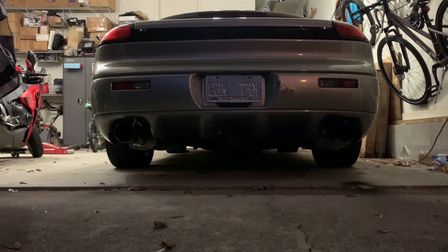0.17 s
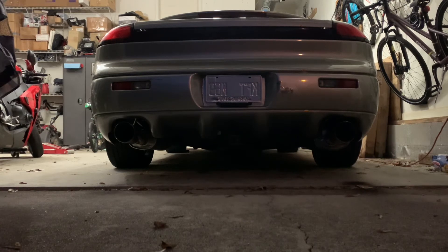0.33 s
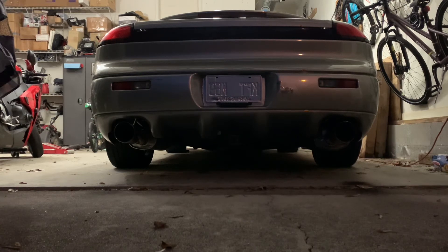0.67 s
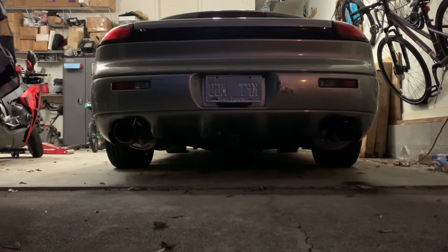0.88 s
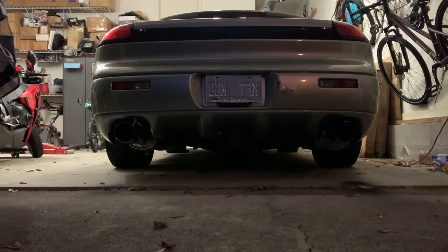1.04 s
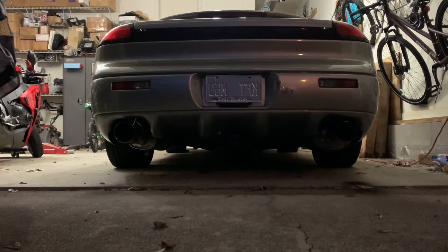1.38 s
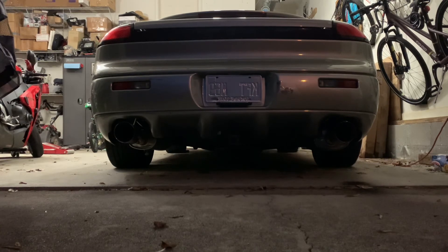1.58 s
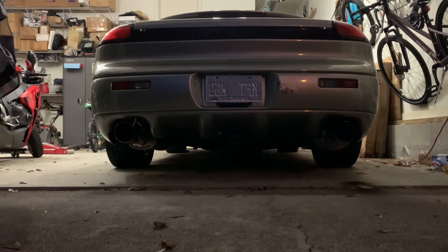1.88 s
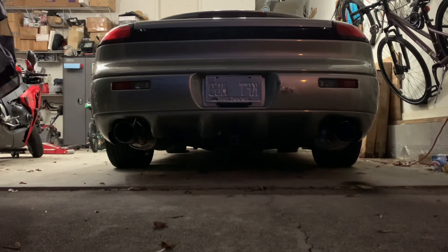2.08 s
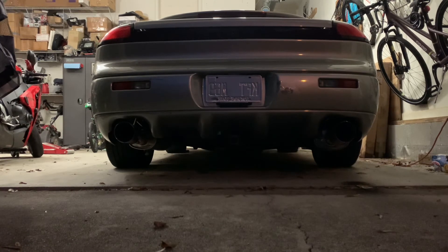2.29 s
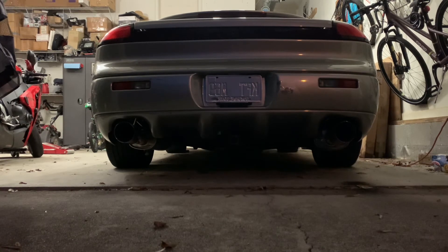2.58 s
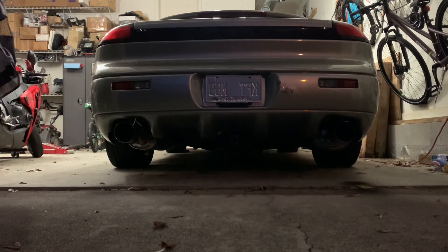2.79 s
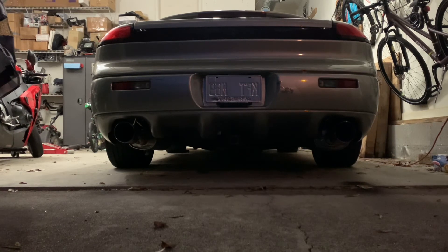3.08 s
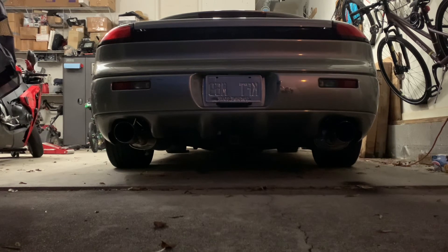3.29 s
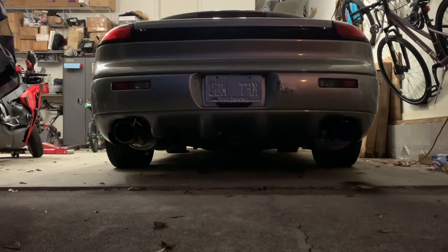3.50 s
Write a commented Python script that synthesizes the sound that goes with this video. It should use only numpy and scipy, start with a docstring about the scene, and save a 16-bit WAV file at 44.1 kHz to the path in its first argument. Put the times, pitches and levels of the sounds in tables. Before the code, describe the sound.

A car engine idles unevenly with a low, throbbing exhaust rumble and small crackling ticks.

```python
"""Open garage, low behind the tailpipes: a six-cylinder car idles unevenly, speeding up and settling.
Each firing sends three pressure surges through the silencer and knocks the pipe modes into ringing;
now and then a cylinder fires weakly and the next one harder. Filtered noise makes the gas rush, which
pulses in step, the mid-band puffs and the wavering rasp. Hot metal spits in grainy treble hisses,
over short squeaks and two thin whining tones made of sines."""
import sys
import numpy as np
from scipy import signal
from scipy.fft import rfft, irfft, next_fast_len
from scipy.io import wavfile
from scipy.ndimage import map_coordinates

SR = 44100
rng = np.random.default_rng(int(sys.argv[2]) if len(sys.argv) > 2 else 0)


def unload_audio(sound):
    """Save the sound as a 16-bit wav file, at the path given as the first command line argument."""
    columns = np.transpose(np.atleast_2d(sound))
    # keep every value between -1 and 1, then stretch to whole-number steps
    steps = np.round(np.clip(columns, -1, 1) * 32767)
    wavfile.write(sys.argv[1], SR, steps.astype(np.int16))


N = 160524
TIME = np.arange(N) / SR

# Engine speed: (time [s], firing rate [Hz])
FIRING_RATE = [(0.0, 26.0), (0.12, 26.13), (0.3, 28.14), (0.5, 29.76), (0.7, 30.79), (0.85, 31.67),
               (1.05, 33.54), (1.2, 33.47), (1.4, 33.33), (1.7, 32.56), (2.1, 31.78), (2.3, 32.26),
               (2.42, 32.26), (2.6, 30.79), (2.9, 29.4), (3.15, 29.61), (3.4, 28.64), (3.64, 27.16)]
# Firings that are weak or ring the pipe little: (time [s], strength [dB], pipe ring [dB])
WEAK_FIRINGS = [(.01, 0, -10), (.16, 0, -14), (.2, -5, -6), (.415, -4, -4), (.515, -2, -6), (.65, -3, -14),
                (.715, -5, -8), (.84, -3, -14), (.995, -6, -4), (1.175, -10, -12), (1.445, -8, -12),
                (1.565, -5, -14), (1.905, -8, -8), (2.03, -8, -12), (2.065, 2, -9), (2.28, -6, -6),
                (2.405, -4, -16), (2.56, -6, -8), (2.69, -7.5, -18), (2.86, -8, -10), (2.89, -3, -10),
                (3.06, -7, -10), (3.095, -2, -12), (3.195, -2, -10), (3.265, -3, -4), (3.405, -3, -14)]
# Pressure surges of one firing:
# (delay [firing intervals], relative level [dB], width [firing intervals], share of the firing's dB [ratio])
FIRING_SURGES = [(.19, -2, .085, .75), (.625, 0, .085, 1.3), (.94, -4, .075, 2)]
# Silencer response: (frequency [Hz], relative gain [dB])
SILENCER_GAIN = [(20, 8), (31, -16), (41, 13), (50, 5), (65, 6.5), (82, 2.8), (110, -1.26), (150, -2.5),
                 (172, -1.5), (200, -15), (260, -7.5), (300, -6), (340, -41), (400, -55)]
# Gas rush and engine-bay noise spectrum: (frequency [Hz], relative density [dB per Hz])
RUSH_SPECTRUM = [(120, -7), (200, -11.5), (300, -11.5), (340, -12.5), (375, -15), (430, -8.5), (520, -14.5),
                 (700, -18), (980, -30), (1280, -22), (1700, -32.5), (1920, -32), (2500, -33), (3050, -36),
                 (3160, -39.5), (4000, -39.5), (6300, -47), (7200, -56.5), (8000, -45), (10000, -45),
                 (12000, -56), (13500, -53)]
# Stereo likeness of the rush: (frequency [Hz], left-right correlation [-1 to 1])
RUSH_LIKENESS = [(100, -0.63), (200, 1), (320, 0.44), (800, 0.85), (1500, 0.51), (2300, 0.19),
                 (2800, -0.36), (4000, -0.24), (8000, 0.17), (12000, 1)]
# Stereo balance of the rush: (frequency [Hz], left over right [dB])
RUSH_BALANCE = [(100, -10), (250, -8.5), (500, 1), (1000, 0.1), (2000, -1), (4000, 1.3), (8000, 5.5),
                (12000, 1.5)]
# Treble hiss, used about its average: (time [s], relative level [dB])
TREBLE_LEVEL = [(0.05, -40.5), (0.24, -39.5), (1.95, -41.5), (2.31, -40.5), (2.77, -42.5), (3.6, -40.5)]
# Faint wavering resonances of pipe and engine bay:
# (frequency [Hz], width [Hz], level before wavering [dB], left-right correlation [-1 to 1])
RASP_RESONANCES = [(420, 22, -31, .9), (1131, 50, -54, .9), (1260, 50, -54, .9), (1513, 30, -55, .7),
                   (1925, 70, -60, .6), (2362, 40, -66, 0), (2619, 70, -65, -.6), (2735, 35, -65, -.7),
                   (3158, 50, -67, -.3)]
# Thin steady tones: (frequency [Hz], rms level [dB])
WHINE_TONES = [(6491, -74), (12989, -79)]
# Modes of the pipe: (frequency [Hz], relative level [dB], 60 dB decay [s], knock length [s])
RING_MODES = [(416.3, 3.5, 0.077, 0.015), (445, -25, 0.036, 0.02), (286.7, -6, 0.063, 0.018),
              (572, -7.5, 0.042, 0.0038), (685, -10.5, 0.087, 0.009)]
# Moments when the pipe rings out: (time [s], relative level [dB])
RING_OUTS = [(0.273, -19), (0.311, -18), (0.379, -20), (0.414, -16), (0.481, -15), (0.584, -15),
             (0.615, -20), (0.633, -18), (0.712, -17), (0.777, -17), (0.809, -14), (0.905, -21),
             (0.965, -17), (0.995, -13), (1.042, -20), (1.087, -17), (1.142, -16), (1.175, -18),
             (1.234, -17), (1.268, -15), (1.322, -13), (1.352, -18), (1.375, -19), (1.408, -21),
             (1.445, -18), (1.506, -16), (1.536, -13), (1.638, -19), (1.689, -19), (1.719, -18),
             (1.779, -14), (1.81, -16), (1.872, -17), (1.903, -17), (1.999, -16), (2.019, -20),
             (2.105, -21), (2.154, -16), (2.182, -18), (2.277, -16), (2.342, -17), (2.372, -14),
             (2.394, -21), (2.481, -19), (2.528, -18), (2.561, -16), (2.625, -19), (2.825, -16),
             (2.86, -20), (3.028, -18), (3.063, -18), (3.164, -20), (3.266, -18), (3.336, -17),
             (3.392, -20)]
# Short squeaks: (start [s], relative level [dB], frequency [Hz])
SQUEAK_EVENTS = [(.079, -51, 3170), (.14, -48, 3180), (.208, -48, 3180), (.419, -44, 3170),
                 (.623, -48, 3170), (.8, -47, 3150), (1.302, -51, 3140), (1.724, -51, 3130),
                 (.3, -53, 3140), (1.058, -52, 3150), (1.148, -52, 3140), (1.665, -53, 3140),
                 (2.257, -53, 3150), (3.149, -51, 3150), (3.365, -52, 3200)]
# Coarse puffs of gas at the tailpipes: (time [s], relative level [dB])
GAS_PUFFS = [(0.085, -30), (0.139, -31), (0.183, -32), (0.232, -32), (0.284, -33), (0.305, -31),
             (0.423, -29), (0.553, -32), (0.592, -31), (0.623, -29), (0.812, -32), (0.855, -32),
             (0.946, -32), (0.976, -32), (1.023, -34), (1.067, -33), (1.113, -33), (1.186, -32),
             (1.242, -33), (1.272, -32), (1.362, -33), (1.542, -32), (1.76, -32), (2.322, -32),
             (2.379, -31), (2.506, -33), (2.665, -32), (2.805, -31), (2.955, -33), (3.039, -33),
             (3.173, -33), (3.207, -34), (3.382, -33), (3.523, -30), (3.561, -34), (3.592, -32)]
# Hot metal spits: (start [s], relative level [dB], centre frequency [Hz], 60 dB decay [s],
# left over right [dB], relative level of the mid band [dB])
METAL_SPITS = [(0.086, -40, 10000, 0.38, 5, -24), (0.123, -40, 10400, 0.48, 4, -23),
               (0.2147, -42, 9400, 0.67, 12, -36), (0.269, -38, 11400, 0.27, 2, -39),
               (0.4592, -37.5, 10500, 0.24, 5, -32), (0.5487, -39.5, 10000, 0.32, 5, -32),
               (0.9449, -34.5, 10100, 0.13, 5, -21), (1.217, -42, 8200, 0.074, 4, -14),
               (1.271, -39, 9700, 0.12, 3, -19.5), (1.3953, -49, 8200, 0.058, 0, -19),
               (1.543, -42, 9100, 0.17, 15, -20), (1.947, -58, 8800, 0.05, 9, 4),
               (2.007, -37, 9200, 0.16, 9, -24), (2.1332, -58, 8300, 0.072, 13, -15),
               (2.32, -44, 9940, 0.058, 1, -21), (2.3794, -35.5, 9230, 0.11, 8, -27),
               (2.507, -39, 10400, 0.11, 5, -18), (2.6041, -49, 8100, 0.067, 8, -7),
               (2.6677, -39, 9500, 0.048, 7, -27), (2.804, -36.5, 10800, 0.16, 6, -22),
               (2.97, -39, 8700, 0.056, 5, -28), (3.0023, -40.5, 10400, 0.17, 6, -16),
               (3.2436, -41, 9120, 0.067, 3, -42), (3.377, -38, 9500, 0.25, 8, -36),
               (3.596, -34.5, 9450, 0.1, 8, -26)]

REFERENCE_HZ = 31       # firing rate at which the speed-dependent levels are neutral
FIRING_LAG = .25        # firing intervals
FIRING_SPREAD_DB = 1.0
AFTER_WEAK = .3         # share of the loss that the next firing gains
WEAK_WIDENS = .04       # extra surge width per dB lost, as a ratio
SURGE_JITTER, SURGE_SPREAD_DB = .013, 1.1   # firing intervals, dB; each surge by itself
LAST_SURGE_DB_PER_HZ = 0.68                 # the third surge grows with the firing rate
ROUGH_DB = -21          # turbulent bass, before the silencer
ENGINE_DB, ENGINE_DB_PER_HZ = -8.3, -0.0755     # slightly quieter as the rate rises

RUSH_DB, RUSH_PATCHY_DB = -25, 2.3
PULSE_DEPTH, PULSE_ANGLE = 0.18, 0.58       # ratio, firing intervals
LOW_RUSH_DB_PER_HZ, MID_RUSH_DB_PER_HZ = -0.2, 0.45     # lows ease, mids grow with the firing rate
RASP_PATCHY_DB = 2.5
WHINE_WANDER_HZ = 7.3

RING_DELAY = .7         # firing intervals after the firing
RING_RISE_S = .011      # from knock to peak
QUIET_RING_DB, RING_DB_PER_HZ, RING_SPREAD_DB = -28, 0.27, 1.0

SQUEAK_S, SQUEAK_DB = .016, 3.5
PUFF_S, PUFF_BAND_HZ, PUFF_DB = 0.0072, (1044, 1386), -3.5
SPIT_DB, SPIT_MID_DB, SPIT_GRAIN_DB = -7.5, 11.5, 2.5
SPIT_HALF_WIDTH_HZ, SPIT_MID_FADE_DB_PER_S = 970, 400
TOP_STOP_HZ = 14873.0   # everything from here up is at least 70 dB down


def amp(db):
    """Turn decibels into an amplitude factor."""
    return 10 ** (np.asarray(db) / 20)


def rms_one(x):
    """Level a signal to an rms of 1."""
    return x / np.sqrt(np.mean(x ** 2) + 1e-20)


def at_time(points):
    """Draw a breakpoint curve over the whole scene."""
    return np.interp(TIME, *np.transpose(points))


def at_hz(points, hz):
    """Read a breakpoint curve along a logarithmic frequency axis."""
    table = np.array(points)
    return np.interp(np.log(hz), np.log(table[:, 0]), table[:, 1])


def colour(x, gain):
    """Multiply the spectrum by gain(Hz)."""
    size = next_fast_len(N + SR // 4)
    hz = np.maximum(np.arange(size // 2 + 1) * SR / size, 1)
    return irfft(rfft(x, size) * gain(hz), size)[..., :N]


def bandpass(x, edges_hz):
    """Keep the band between two edges."""
    return signal.sosfilt(signal.butter(2, edges_hz, "band", fs=SR, output="sos"), x)


def drift(rate):
    """Smooth random wander of rms 1, through 2 * rate random points per second."""
    count = int(N / SR * rate * 2) + 3
    return rms_one(map_coordinates(rng.standard_normal(count), [TIME * rate * 2], order=3))


def firings():
    """Integrate the firing rate to a crank position in firings; give each its strength and pipe ring."""
    crank = np.cumsum(at_time(FIRING_RATE)) / SR - FIRING_LAG
    strength_db = FIRING_SPREAD_DB * rng.standard_normal(int(crank[-1]) + 6)
    ring_db = np.zeros_like(strength_db)
    for time_s, weak_db, weak_ring_db in WEAK_FIRINGS:
        k = int(round(crank[int(time_s * SR)])) + 2
        strength_db[k], ring_db[k] = weak_db, weak_ring_db
        strength_db[k + 1] = -AFTER_WEAK * weak_db
    return crank + 2, strength_db, ring_db


def exhaust(crank, strength_db, faster):
    """Each surge is a push between two pulls, a little early or late; the silencer keeps only the bass."""
    out = amp(ROUGH_DB) * rms_one(colour(rng.standard_normal(N), lambda hz: hz < 400))
    for k, (delay, surge_db, width, share) in enumerate(FIRING_SURGES):
        which = np.round(crank - delay).astype(int)
        late, own = rng.standard_normal((2, len(strength_db)))[:, which]
        firing_db = strength_db[which]
        wide = width * (1 - WEAK_WIDENS * np.minimum(firing_db, 0))
        u = ((crank - delay - which - SURGE_JITTER * late) / wide) ** 2
        grows_db = LAST_SURGE_DB_PER_HZ * faster * (k == 2)
        level_db = surge_db + share * firing_db + SURGE_SPREAD_DB * own + grows_db
        out = out + amp(level_db) * (1 - 2 * u) * np.exp(-u)
    muffled = rms_one(colour(out, lambda hz: amp(at_hz(SILENCER_GAIN, hz))))
    return amp(ENGINE_DB + ENGINE_DB_PER_HZ * faster) * muffled


def rush(crank, faster):
    """Stereo noise, pulsing twice per firing below the treble, each lower octave flickering by itself."""
    def alike(hz):
        return np.clip(at_hz(RUSH_LIKENESS, hz), -1, 1)

    mid, side = rng.standard_normal((2, N))
    mid = colour(mid, lambda hz: np.sqrt(1 + alike(hz)))
    side = colour(side, lambda hz: np.sqrt(1 - alike(hz)))
    pulse = 1 + PULSE_DEPTH * np.cos(4 * np.pi * (crank - PULSE_ANGLE))
    treble_db = at_time(TREBLE_LEVEL)
    treble_db = treble_db - treble_db.mean()
    out = 0
    for centre in 150 * 2. ** np.arange(7):
        top = 1 if centre < 9000 else 0   # the highest band stays open upwards

        def band(hz):
            octaves = np.clip(np.log2(hz / centre), -1, top)
            return amp(at_hz(RUSH_SPECTRUM, hz)) * np.cos(np.pi / 2 * octaves)

        left, right = [colour(mid + s * side, lambda hz: band(hz) * amp(s * at_hz(RUSH_BALANCE, hz) / 2))
                       for s in (1, -1)]
        if centre < 2000:
            db_per_hz = LOW_RUSH_DB_PER_HZ if centre < 500 else MID_RUSH_DB_PER_HZ
            level = amp(RUSH_PATCHY_DB * drift(10.0) + db_per_hz * faster) * pulse
        else:
            level = amp(treble_db)
        out = out + np.array([left, right]) * level
    return amp(RUSH_DB) * rms_one(out)


def rasp():
    """Noise in narrow resonances that swell and fade on their own."""
    out = 0
    for centre, width_hz, db, alike in RASP_RESONANCES:
        noise = rng.standard_normal((2, N))
        mid, side = rms_one(colour(noise, lambda hz: 1 / (1 + (2 * (hz - centre) / width_hz) ** 2)))
        alike = np.clip(alike, -1, 1)
        pair = np.sqrt((1 + alike) / 2) * mid + np.sqrt((1 - alike) / 2) * side * [[1], [-1]]
        out = out + amp(db + RASP_PATCHY_DB * drift(12.0)) * pair
    return out


def whine():
    """Two thin sine tones whose pitch wanders a little, together."""
    wander = np.cumsum(WHINE_WANDER_HZ * drift(3.6)) / SR
    return sum(amp(db) * np.sqrt(2) * np.sin(2 * np.pi * (hz * TIME + wander)) for hz, db in WHINE_TONES)


def pipe_ring(crank, ring_db, faster):
    """A soft knock per firing rings the decaying pipe modes, some loudly; weak firings mostly ring little."""
    which = np.arange(2, int(crank[-1] - RING_DELAY))
    at = np.searchsorted(crank, which + RING_DELAY)
    level_db = QUIET_RING_DB + ring_db[which] + RING_DB_PER_HZ * faster[at]
    for time_s, loud_db in RING_OUTS:
        i = int((time_s - RING_RISE_S) * SR)
        k = np.abs(at - i).argmin()
        if abs(at[k] - i) < RING_RISE_S * SR / 2:   # close to a knock: raise that one
            level_db[k] = loud_db
        else:                                       # between knocks: add one
            at, level_db = np.r_[at, i], np.r_[level_db, loud_db]
    out = 0
    for hz, mode_db, t60, knock_s in RING_MODES:
        knocks = np.full(N, 1e-18)
        knocks[at] = amp(mode_db + level_db + RING_SPREAD_DB * rng.standard_normal(len(at)))
        r, w = amp(-60 / (t60 * SR)), 2 * np.pi * hz / SR
        soft = np.hanning(int(knock_s * SR) + 3)
        burst = soft * np.cos(w * np.arange(len(soft))) * 2 / soft.sum()
        drive = signal.fftconvolve(knocks, burst)[:N]
        out = out + signal.lfilter([0, np.sin(w)], [1, -2 * r * np.cos(w), r * r], drive)
    return out


def squeaks():
    """Brief smooth sine tones under bell-shaped swells, a belt or a bracket perhaps."""
    out = 0
    for start_s, db, hz in SQUEAK_EVENTS:
        swell = np.exp(-((TIME - start_s - SQUEAK_S / 2) / SQUEAK_S * 2) ** 2)
        out = out + amp(db + SQUEAK_DB) * swell * np.sin(2 * np.pi * hz * TIME)
    return out


def puffs():
    """Coarse gas puffs: brief smooth swells of mid-band noise."""
    swell = sum(amp(db + PUFF_DB) * np.exp(-((TIME - time_s) / PUFF_S) ** 2) for time_s, db in GAS_PUFFS)
    return swell * rms_one(bandpass(rng.standard_normal(N), PUFF_BAND_HZ))


def spits():
    """Hot metal spits: grainy hisses that start at once and die away, each with a duller knock below."""
    out = np.zeros((2, N + SR))
    t = TIME[:SR // 4]
    for start_s, db, hz, t60, pan_db, mid_db in METAL_SPITS:
        white = rng.standard_normal(len(t))
        grain = np.repeat(rng.standard_normal(len(t) // 64 + 1), 64)[:len(t)]   # steps of 64 samples
        grainy = white * amp(SPIT_GRAIN_DB * grain)
        hiss = rms_one(bandpass(grainy, [hz - SPIT_HALF_WIDTH_HZ, hz + SPIT_HALF_WIDTH_HZ]))
        knock = rms_one(bandpass(grainy, [2300, 4800]))
        knock = knock * amp(SPIT_MID_DB + mid_db - SPIT_MID_FADE_DB_PER_S * t)
        spit = amp(db - 60 * t / t60) * (amp(SPIT_DB) * hiss + knock)
        i = int(start_s * SR)
        out[:, i:i + len(t)] += spit * amp([[pan_db / 2], [-pan_db / 2]])
    return out[:, :N]


def scene():
    """Mix all layers in stereo, with surges, pipe ring and squeaks leaning left."""
    crank, strength_db, ring_db = firings()
    faster = at_time(FIRING_RATE) - REFERENCE_HZ
    ring = pipe_ring(crank, ring_db, faster)
    late = np.interp(TIME - .0002, TIME, ring)   # the right side lags by 0.2 ms
    surges = exhaust(crank, strength_db, faster) * amp([[1.1], [-1.1]])
    pipes = surges + np.array([ring * amp(3.6), late * amp(1.0)])
    gas = puffs() + rush(crank, faster) + rasp()
    return pipes + gas + spits() + whine() + squeaks() * amp([[1.5], [-1.5]])


def record(dry):
    """Peaks are rounded by soft saturation and a steep low-pass cuts the top."""
    low_pass = signal.cheby2(12, 70, TOP_STOP_HZ, fs=SR, output="sos")
    return signal.sosfilt(low_pass, np.tanh(dry))


dry = scene()
out = record(dry)
unload_audio(out)
```